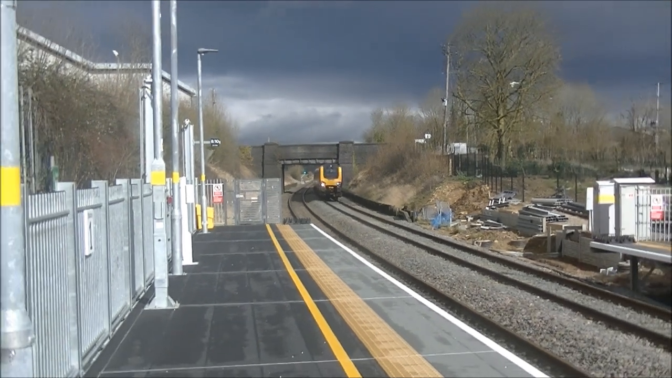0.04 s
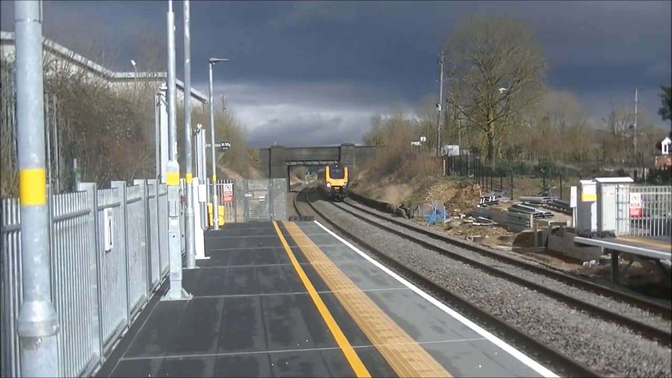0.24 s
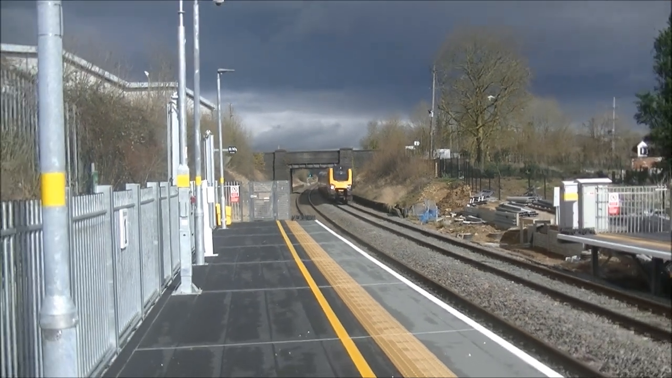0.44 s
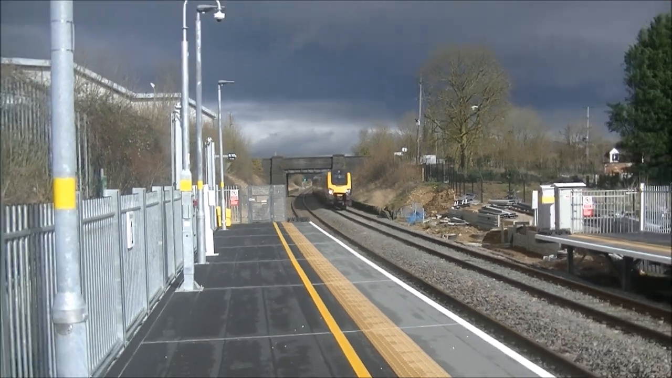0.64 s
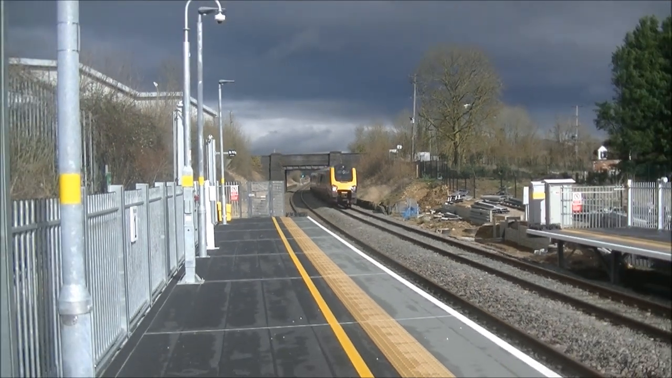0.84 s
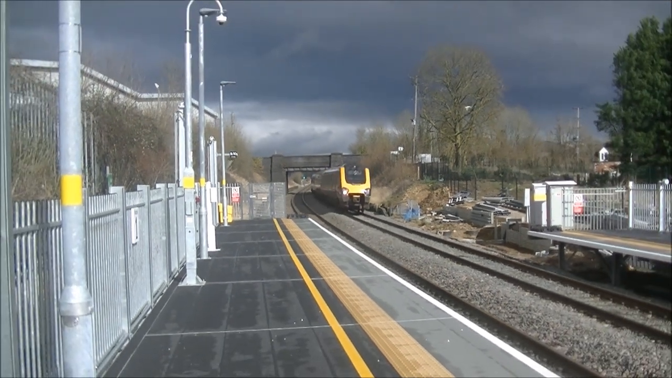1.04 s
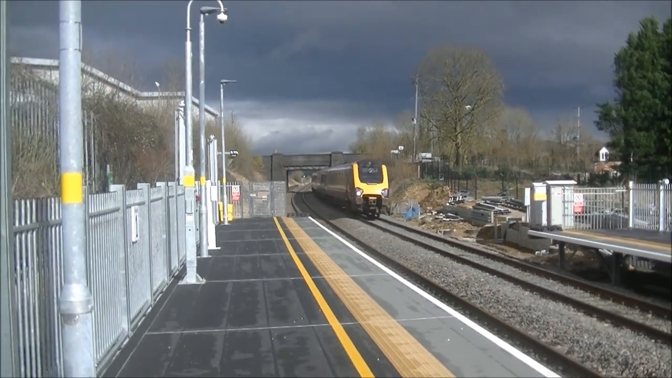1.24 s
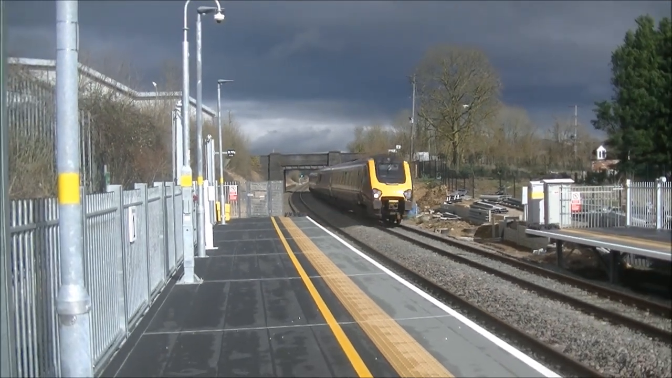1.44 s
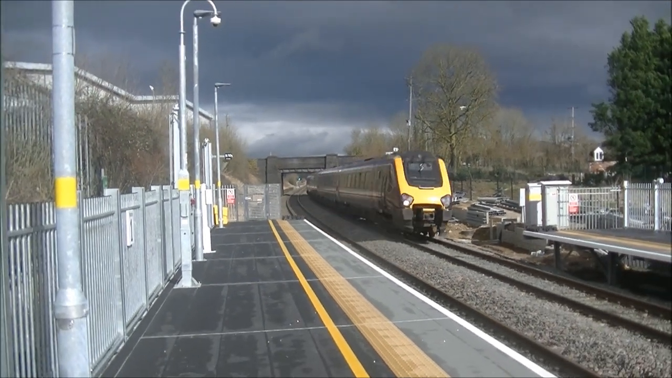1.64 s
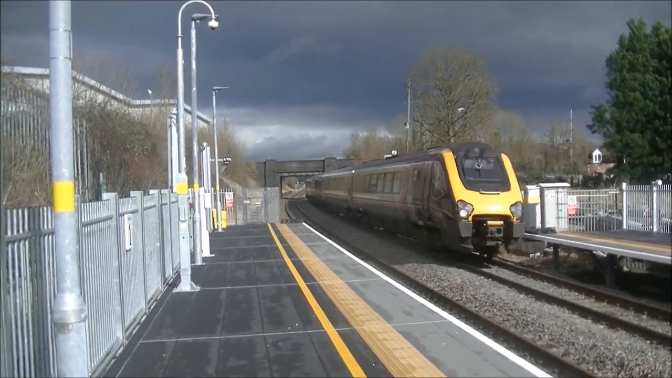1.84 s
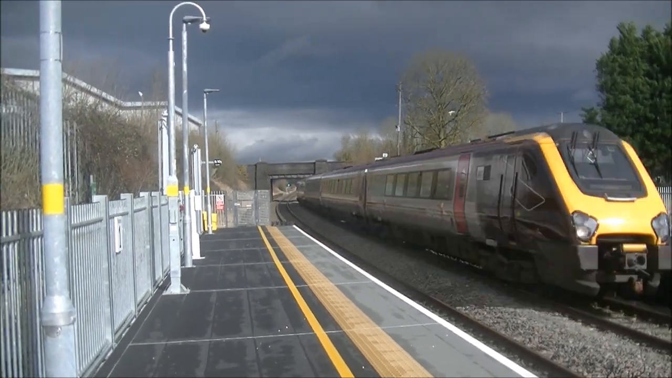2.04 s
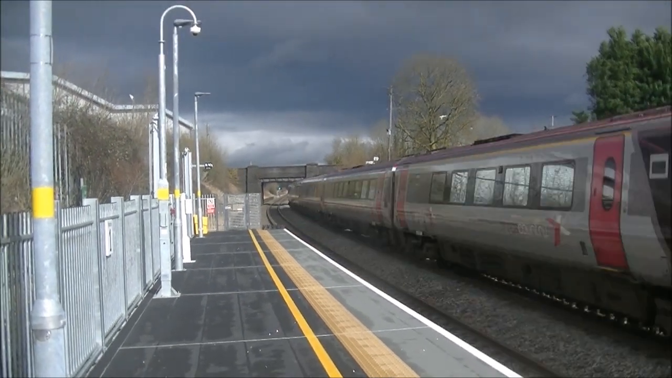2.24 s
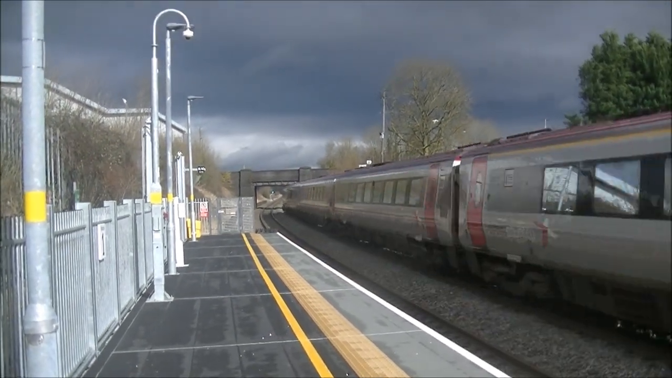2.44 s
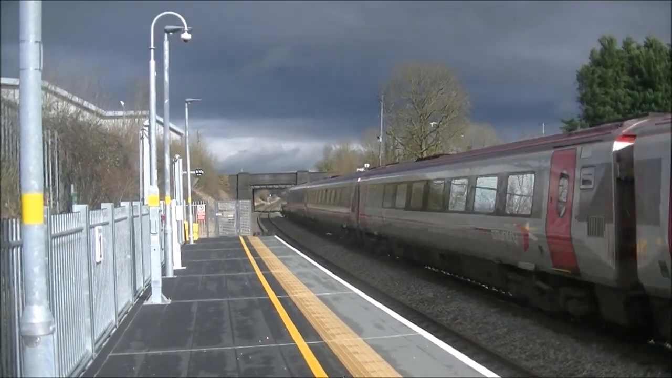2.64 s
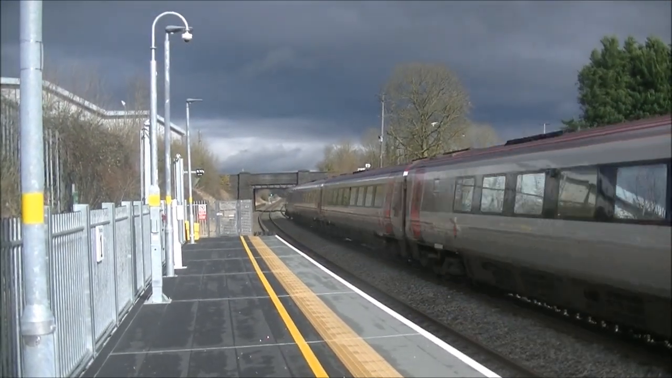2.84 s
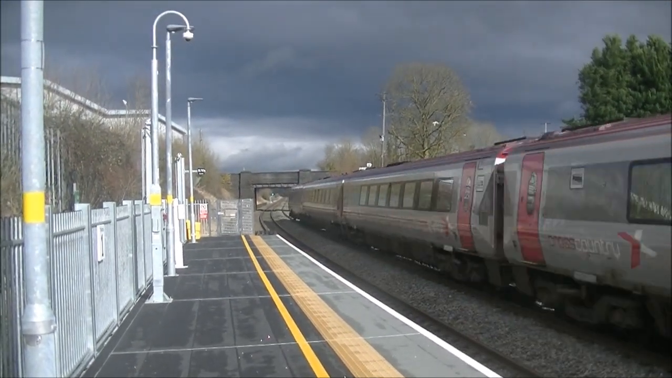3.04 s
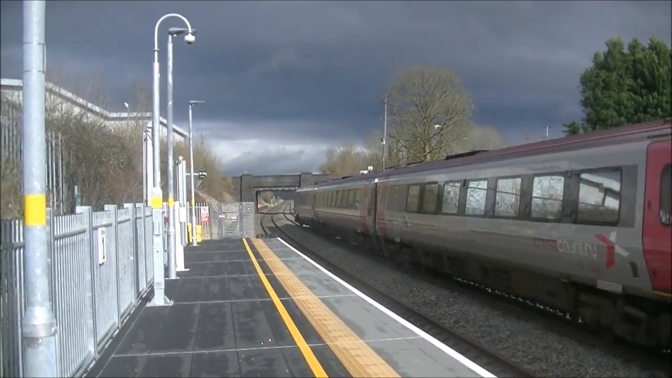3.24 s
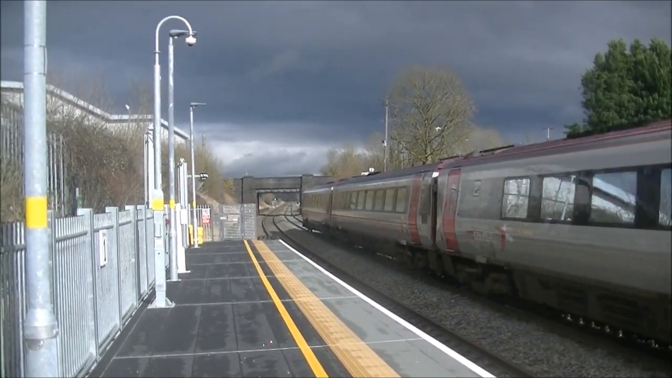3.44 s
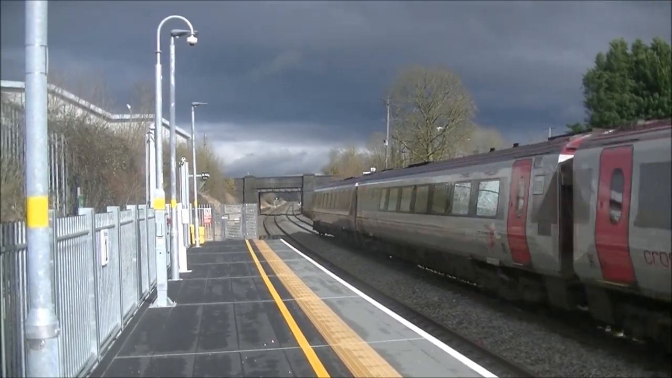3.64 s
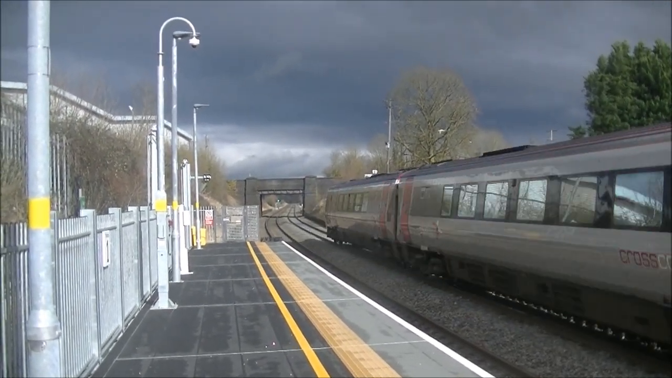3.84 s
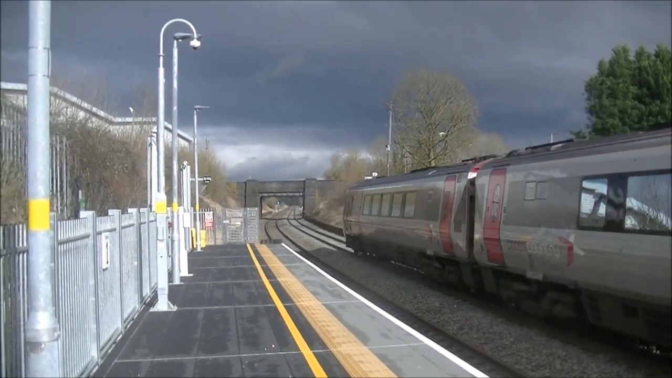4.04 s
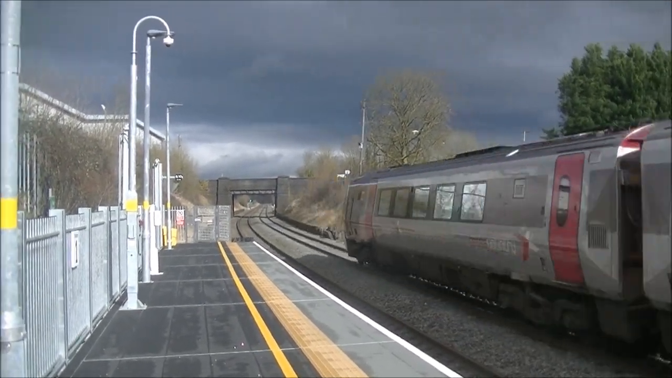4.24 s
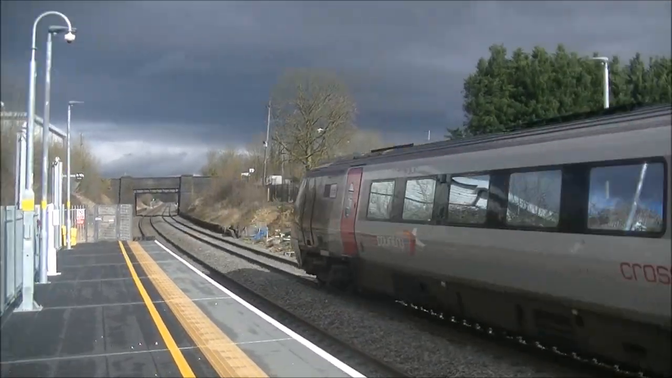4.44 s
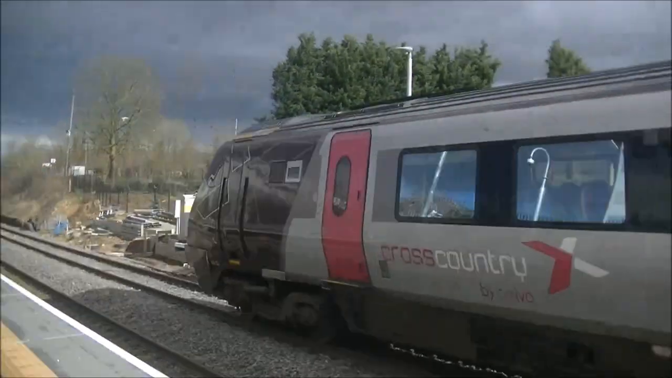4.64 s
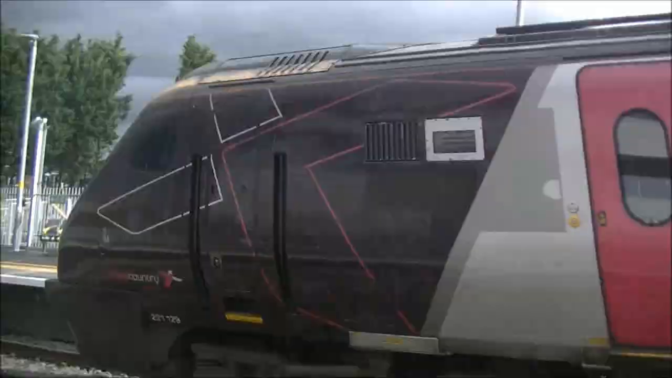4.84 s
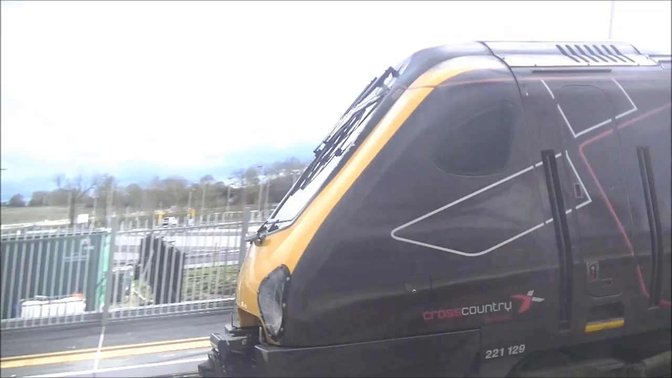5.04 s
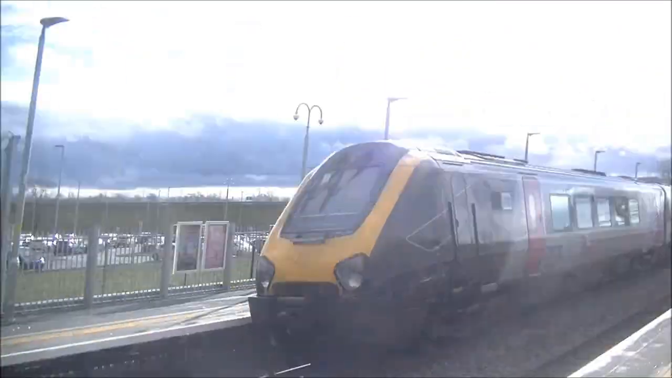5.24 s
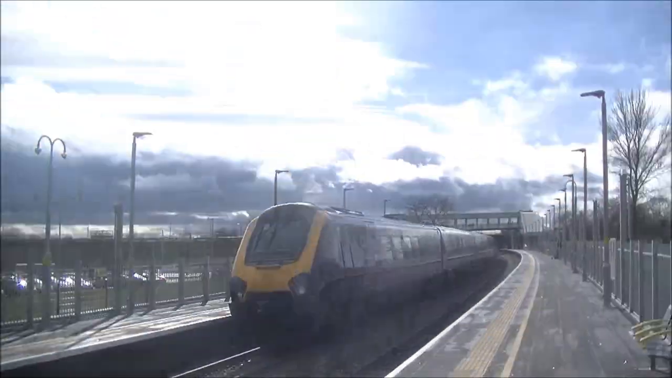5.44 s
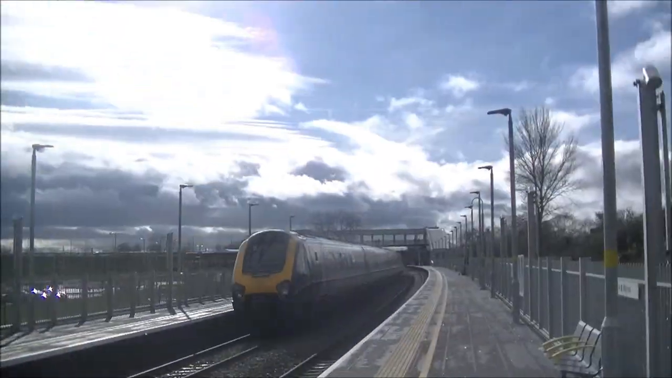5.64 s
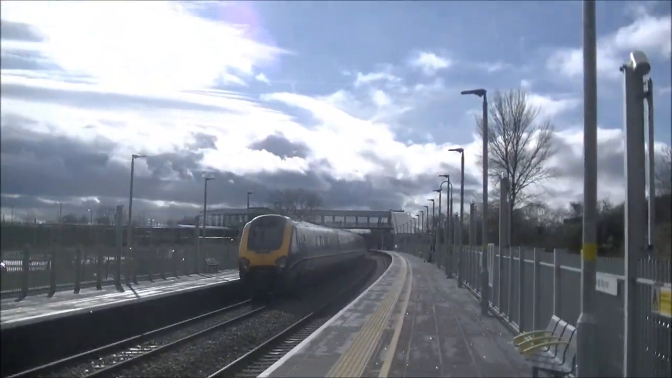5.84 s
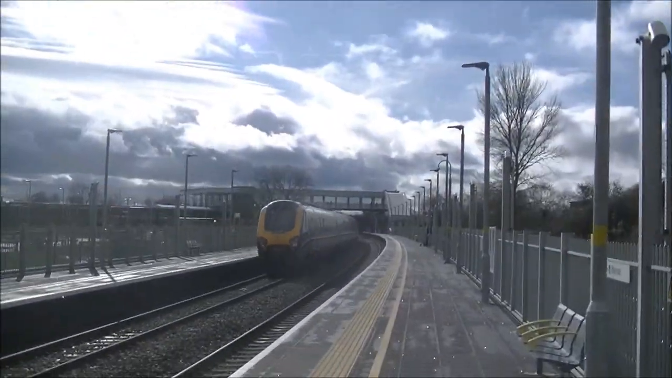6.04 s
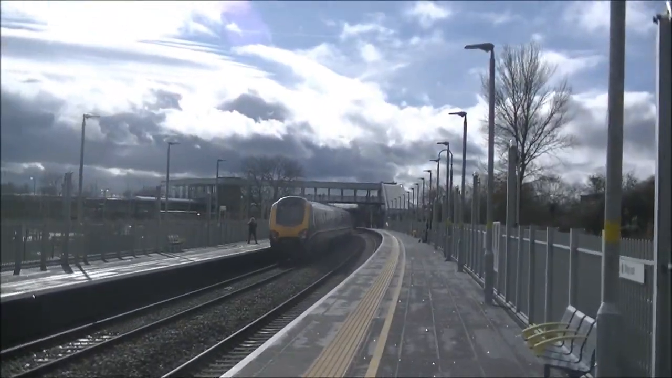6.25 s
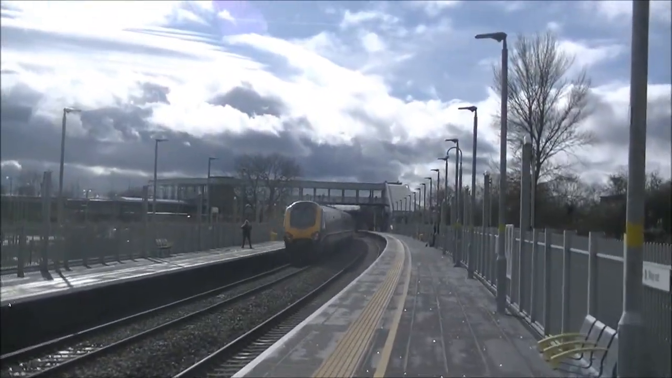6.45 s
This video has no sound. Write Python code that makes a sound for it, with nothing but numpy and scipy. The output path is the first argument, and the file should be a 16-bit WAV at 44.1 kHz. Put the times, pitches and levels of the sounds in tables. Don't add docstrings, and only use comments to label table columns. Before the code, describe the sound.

Rails sing faintly, then a fast diesel passenger train bursts past a station platform in pulsing wheel roar and rapid metallic knocks, fading to ringing rails.

```python
import sys
import numpy as np
from scipy import signal
from scipy.fft import rfft, irfft, next_fast_len
from scipy.io import wavfile
from scipy.ndimage import uniform_filter1d

SR = 44100
rng = np.random.default_rng(int(sys.argv[2]) if len(sys.argv) > 2 else 0)


def invert_db(x):
    u = np.asarray(x, float) / 20
    return 10 ** u


def generate_wav(sig):
    pcm = np.round(np.clip(np.atleast_2d(sig).T, -1, 1) * 32767).astype(np.int16)
    wavfile.write(sys.argv[1], SR, pcm)


N = 287046
T = np.arange(N) / SR
SIZE = next_fast_len(N)
HZ = np.arange(SIZE // 2 + 1) * SR / SIZE

ARRIVES_S, DEPARTS_S = 2.23, 5.23
SPEED_M_S = 42.74
DROP_PER_S = 0.59

ZONE_HZ = [600, 2000, 5500, 11500]
# [t/s, peak level/dB, rim f/Hz]
KNOCKS = [(2.2278, -15, 1710), (2.2814, -15, 2290), (2.3534, -16, 2510), (2.5434, -10, 2180),
          (2.608, -13, 2080), (2.7084, -18, 2350), (2.7844, -16, 2200), (2.8464, -10, 2140),
          (2.9714, -14, 2010), (3.0944, -16, 2120), (3.1587, -16, 2190), (3.2124, -12, 2060),
          (3.325, -11, 2330), (3.3747, -14, 2320), (3.3924, -12, 2220), (3.4326, -6, 2230),
          (3.454, -8, 2144), (3.4875, -6, 2140), (3.557, -6.5, 2680), (3.6114, -7, 2190),
          (3.7804, -17, 2560), (3.9145, -8, 2290), (3.9654, -11, 2000), (4.025, -12, 2230),
          (4.1084, -14, 1990), (4.2054, -13, 2280), (4.4064, -13, 2280), (4.5104, -12, 2230),
          (4.5755, -10, 2180), (4.6384, -14, 2390), (4.6894, -9, 2230), (4.7524, -10, 2020),
          (4.8494, -14, 2190), (4.9162, -14, 2186), (4.9514, -12, 2300), (5.0664, -6, 2710),
          (5.1297, -13, 2040), (5.1901, -17, 1990), (5.2175, -19, 1740), (5.2534, -15, 2040),
          (5.3754, -16.5, 2160)]


def shape(table, hz):
    f, v = np.transpose(table)
    return np.interp(np.log(np.maximum(hz, 1)), np.log(np.maximum(f, 1)), v)


def walk(rate_hz):
    hold = max(int(SR / rate_hz), 1)
    steps = np.repeat(rng.standard_normal(N // hold + 1), hold)
    return 1.7 * uniform_filter1d(uniform_filter1d(steps, hold), hold)[:N]


def ring(hz, width_hz, steady):
    sway = steady + walk(width_hz) + 1j * walk(width_hz)
    tone = (sway * np.exp(2j * np.pi * np.cumsum(hz) / SR)).real
    return tone / tone.std()


def pair(x, pan_db):
    return x * invert_db(np.array([pan_db, -pan_db]) / 2)


def struck(s, rise_s, fall_s):
    return np.exp(-np.abs(T - s) / np.where(T < s, rise_s, fall_s))


def throbbing():
    blows = sum(struck(s + .005, .005, .02) for s, db, hz in KNOCKS)
    shake = np.minimum(blows, 1) - .5
    return shake * np.clip(np.minimum(T - ARRIVES_S, DEPARTS_S + .1 - T) / .1, 0, 1)


def nearness():
    # [level abreast/dB, nearest distance/m, loss ahead/dB per 100 m, loss behind/dB per 100 m]
    zones = [
        (-28, 8.94, 7.5, 1.5),
        (-23.5, 7.6, 9, 4),
        (-27, 7.56, 5.5, 2),
        (-46.5, 7, 6, 2),
    ]
    roar_share = [0, 1, 0, 0]
    bright_share = [-0.73, 0.053, 0.28, 1]
    engine_weight_db = [-1.6, -1.9, -1.9, 0.01]
    open_air_db = [-58.5, -53, -65, -66.5]
    # [t abreast/s, rolling strength/dB, rough-tread roar/dB, brightness/dB]
    bogie_pairs = [
        (2.421, 1.3, -4, -0.5),
        (2.97, 0.5, 0.5, 1.8),
        (3.431, 1.8, 2, 1),
        (3.931, 0.85, -1.5, 0.1),
        (4.53, 0.3, -0.7, 1.8),
        (5.06, -0.07, 0.1, 3),
    ]
    # [t abreast/s, level/dB]
    engines = [
        (2.2, -7),
        (2.7, -5.5),
        (3.2, -17),
        (3.72, -5),
        (4.3, -1.5),
        (4.8, -4.5),
        (5.25, -26),
    ]
    s, strength_db, roar_db, bright_db = np.transpose(bogie_pairs)[:, :, None]
    along_m = SPEED_M_S * (T - s)
    engine_s, engine_db = np.transpose(engines)[:, :, None]
    engine_along_m = SPEED_M_S * (T - engine_s)
    levels = []
    for zone, roar, bright, weight_db, far_db in zip(
            zones, roar_share, bright_share, engine_weight_db, open_air_db):
        db, near_m, ahead_db, behind_db = zone
        loss_db = np.abs(along_m) / 100 * np.where(along_m < 0, ahead_db, behind_db)
        source_db = strength_db + roar * roar_db + bright * bright_db
        wheel_power = invert_db(2 * (source_db - loss_db)) / (1 + (along_m / near_m) ** 2)
        engine_power = invert_db(2 * (engine_db + weight_db)) / (1 + (engine_along_m / near_m) ** 2) ** 2
        train_power = invert_db(2 * db) * (wheel_power.sum(axis=0) + engine_power.sum(axis=0))
        levels.append(10 * np.log10(train_power + invert_db(2 * far_db)))
    levels[1] = levels[1] + 1.5 * throbbing()
    return levels


def levelled(colour):
    # [low f/Hz, high f/Hz]
    zone_edges_hz = [(150, 1200), (1200, 3000), (3000, 9000), (9300, 15000)]
    db = shape(colour, HZ)
    zone_db = []
    for lo, hi in zone_edges_hz:
        power = np.sum(invert_db(2 * db[(HZ > lo) & (HZ < hi)])) / len(HZ)
        zone_db.append(10 * np.log10(power))
    return db - shape(list(zip(ZONE_HZ, zone_db)), HZ)


def rolling(zones_db, pan_db):
    # [f/Hz, density/dB per Hz]
    coming = [(150, -110), (200, -92), (320, -96), (420, -79), (700, -80), (1100, -75.5), (1380, -77.5),
              (2300, -77), (2950, -85), (3900, -82.5), (6000, -92.5), (8300, -95), (9600, -100),
              (14500, -102), (15400, -112)]
    # [f/Hz, density/dB per Hz]
    passing = [(59, -76), (100, -46), (341, -15), (590, -8.5), (744, -4.5), (1340, -6), (2280, 0),
               (2640, -2.5), (3790, -3.5), (4780, -11.5), (5310, -7), (7930, -15.5), (8700, -18.5),
               (9590, -28), (12900, -29.5), (15600, -36)]
    # [f/Hz, density/dB per Hz]
    leaving = [(100, -106), (250, -91.5), (500, -74), (900, -70), (1250, -71), (2150, -67), (2800, -76),
               (4000, -73), (5500, -79.5), (8300, -83.5), (9500, -89), (12000, -92), (15000, -91),
               (15700, -97)]
    # [f/Hz, likeness 0-1]
    likeness = [(100, 0.39), (200, 0.97), (500, 0.98), (1000, 0.86), (2000, 0.91), (4000, 0.89),
                (8000, 0.92), (12000, 0.9)]
    blend_s = 0.14
    ahead = 1 / (1 + np.exp((T - ARRIVES_S) / blend_s))
    behind = 1 / (1 + np.exp((DEPARTS_S - T) / blend_s))
    abreast = np.maximum(1 - ahead - behind, 0)
    bass_cut = 1 / np.sqrt(1 + (125 / np.maximum(HZ, 1)) ** 6)
    noise = np.zeros((2, N))
    for share, colour in ((ahead, coming), (abreast, passing), (behind, leaving)):
        spectrum = rfft(rng.standard_normal((2, SIZE))) * invert_db(levelled(colour)) * bass_cut
        noise = noise + np.sqrt(share) * irfft(spectrum, SIZE)[:, :N]
    noise = rfft(noise, SIZE)
    out, flicker = 0, walk(8.1)
    for step in range(23):
        hz = 100 * 2 ** (step / 3)
        offset = np.clip(3 * np.log2(np.maximum(HZ, 1) / hz), -1, 1)
        mid, side = irfft(noise * np.cos(np.pi / 2 * offset) ** 2, SIZE)[:, :N]
        place = np.interp(np.log(hz), np.log(ZONE_HZ), np.arange(4))
        below = min(int(place), 2)
        part = place - below
        db = (1 - part) * zones_db[below] + part * zones_db[below + 1]
        flicker = 0.48 * flicker + 0.65 * walk(9.9)
        db = db + (.5 + 0.55 * min(hz / 8000, 1)) * flicker
        like = np.clip(shape(likeness, hz), 0, .995)
        both = np.sqrt((1 + like) / 2) * mid + np.sqrt((1 - like) / 2) * side * np.array([[1], [-1]])
        directional = 0.8 * np.exp(-(np.log2(hz / 1600) / 0.79) ** 2)
        out = out + pair(invert_db(db) * both, pan_db * directional)
    return out


def rails():
    # [t/s, partial spacing/Hz, whine level/dB, hum level/dB]
    sing = [
        [(0, 782, -63.5, -65), (2.5, 773.5, -56, -48)],
        [(5.15, 732, -52, -45.5), (6.51, 722.5, -60.5, -58)],
    ]
    # [number, level ahead/dB, level behind/dB]
    partials = [(7, -14, -8), (8, -12, -8), (9, -4, -1), (10, -5, -1), (11, -8, -1), (12, -15, -3),
                (13, -11, -14), (14, -13, -9), (15, -12, -15), (16, -13, -10), (17, -13, -10),
                (18, -12, -10), (19, -18, -10)]
    # [f ahead/Hz, width/Hz, level ahead/dB, level behind/dB]
    resonances = [(470, 70, -2, -10), (813, 35, 2, -9), (974, 45, -5, -20), (992, 40, -20, 0),
                  (1068, 70, 1, -4), (1195, 90, 3, -3), (1590, 40, -7, -4), (2335, 160, -2, 2),
                  (4250, 400, -20, 1), (5610, 50, -10, -8), (7700, 70, -8, -10), (8430, 30, -12, -9)]
    # [t/s, f/Hz, width/Hz, half length/s, level/dB]
    flares_ahead = [(.4, 10142, 40, .14, -69), (1.27, 8565, 40, .2, -54), (1.38, 8420, 40, .08, -60),
                    (1.78, 8545, 50, .24, -56), (2.32, 8550, 60, .05, -49), (1.65, 7700, 120, .35, -55),
                    (2.03, 5450, 70, .2, -45), (1.88, 5470, 90, .045, -45), (1.79, 5500, 150, .06, -56),
                    (2.25, 5350, 200, .1, -46), (1.38, 1592, 20, .08, -43), (1.24, 1592, 40, .05, -53),
                    (1.85, 1585, 30, .06, -47), (2.05, 1585, 30, .08, -46), (1.6, 1590, 30, .08, -52),
                    (.6, 7030, 140, .6, -63), (.5, 700, 60, .3, -58), (.68, 1592, 30, .13, -57),
                    (.45, 968, 30, .26, -54), (.4, 1070, 80, .15, -53), (.645, 1230, 40, .025, -47),
                    (.66, 1075, 40, .035, -46), (.97, 972, 30, .15, -46), (.95, 1060, 40, .06, -49),
                    (1.07, 812, 25, .23, -53), (1.57, 975, 30, .13, -42), (1.91, 970, 30, .12, -43),
                    (1.62, 1068, 40, .2, -46), (2.1, 1065, 40, .06, -42)]
    # [t/s, f/Hz, width/Hz, half length/s, level/dB]
    flares_behind = [(5.33, 8010, 260, .18, -45), (5.59, 7990, 100, .04, -49), (5.32, 7300, 160, .18, -48),
                     (5.81, 7040, 40, .045, -54), (6.14, 7240, 70, .055, -55), (6.13, 8730, 40, .08, -59),
                     (5.66, 8745, 70, .2, -58), (5.58, 6530, 60, .03, -49), (5.5, 700, 60, .03, -43),
                     (6.2, 1030, 50, .08, -50), (6.04, 2170, 25, .11, -40.5), (5.28, 925, 30, .05, -39),
                     (5.41, 925, 35, .04, -42), (5.53, 925, 35, .05, -42), (5.7, 925, 50, .04, -44),
                     (5.86, 925, 60, .08, -46), (5.84, 2000, 500, .08, -42), (5.8, 3900, 700, .08, -46),
                     (6.25, 920, 40, .2, -52)]
    s, *columns = np.concatenate(sing).T
    spacing_hz, whine_db, hum_db = (np.interp(T, s, c) for c in columns)
    ahead = np.clip((sing[0][-1][0] - T) / 0.24, 0, 1)
    behind = np.clip((T - sing[1][0][0]) / 0.19, 0, 1)
    out = 0
    for k, ahead_db, behind_db in partials:
        size = (ahead * invert_db(ahead_db) + behind * invert_db(behind_db)) * invert_db(whine_db + 2.2 * walk(6))
        out = out + size * ring(k * spacing_hz, 40 + 6 * k, steady=.35)
    for hz, width_hz, ahead_db, behind_db in resonances:
        size = (ahead * invert_db(ahead_db) + behind * invert_db(behind_db)) * invert_db(hum_db + 2.0 * walk(6))
        out = out + size * ring(hz * spacing_hz / 779, width_hz, steady=0)
    for s, hz, width_hz, half_s, db in [*flares_ahead, *flares_behind]:
        size = invert_db(db) * np.exp(-((T - s) / half_s) ** 4)
        steady = min(65 / width_hz, 1.6) ** 2
        out = out + size * ring(np.full(N, hz), width_hz, steady)
    return out


def wind():
    # [t/s, level/dB]
    gust_table = [
        (1.05, -86),
        (1.47, -91),
        (2.45, -84),
        (2.77, -77),
        (3.1, -80),
        (3.42, -75),
        (4.4, -75),
        (5.07, -77),
        (5.8, -83),
    ]
    calm_db, draught_db, gust_s = -85.5, -80, .11
    low = signal.sosfilt(signal.butter(2, 110, fs=SR, output="sos"), rng.standard_normal((2, N)))
    draught = np.clip(np.minimum(T - ARRIVES_S, DEPARTS_S + .7 - T) / .3, 0, 1)
    gusts = sum(invert_db(db) * np.exp(-((T - s) / gust_s) ** 2) for s, db in gust_table)
    size = np.maximum(gusts, invert_db(calm_db + draught * (draught_db - calm_db)))
    return low / low.std() * size * invert_db(2 + 1.5 * walk(6))


def ticks():
    # [t/s, peak level/dB]
    contacts = [
        (1.4523, -10.5),
        (1.4646, -17.5),
        (1.4676, -21),
    ]
    # [f/Hz, level/dB, t60/s]
    shell = [(2510, 0, 0.0075), (3170, 6, 0.004), (3700, 0, 0.008), (4250, 2, 0.0045), (5700, -2, 0.0065),
             (7460, -14, .002)]
    t, out = T[:SR // 10], np.zeros(N)
    body = 0
    for hz, db, t60_s in shell:
        body = body + invert_db(db) * np.sin(2 * np.pi * hz * t) * np.exp(-np.log(1000) * t / t60_s)
    body = body * (1 - np.exp(-t / 0.00014))
    body = signal.sosfilt(signal.butter(2, 1200, "high", fs=SR, output="sos"), body)
    thump = invert_db(-46) * np.sin(2 * np.pi * 120 * t) * np.exp(-t / .012)
    body = body / np.max(np.abs(body)) + thump
    for s, db in contacts:
        start = int(s * SR)
        out[start:start + len(t)] += invert_db(db) * body
    return out


def bogies():
    # [t/s, f abreast/Hz, half length/s, level/dB]
    discs = [(2.49, 7750, .05, -48), (2.55, 4400, .04, -40), (2.59, 5380, .05, -41), (2.73, 7550, .05, -47),
             (2.8, 8500, .05, -47), (2.9, 8900, .04, -48), (2.92, 6750, .04, -41), (2.95, 4430, .05, -35),
             (3.13, 6830, .07, -43), (3.25, 6000, .04, -45), (3.29, 8350, .04, -47), (3.33, 3020, .06, -33),
             (3.385, 2320, .025, -25), (3.42, 3720, .05, -30), (3.43, 7850, .04, -45),
             (3.44, 2880, .04, -30), (3.49, 3430, .018, -27), (3.5, 6700, .06, -43), (3.52, 8650, .04, -45),
             (3.54, 5580, .045, -39), (3.525, 2750, .012, -29), (3.59, 2320, .05, -31),
             (3.575, 3950, .015, -32), (3.615, 3900, .015, -31), (3.65, 4600, .04, -39),
             (3.89, 5420, .04, -41), (3.9, 8850, .07, -48), (3.93, 3650, .04, -35), (3.93, 3390, .04, -37),
             (3.98, 6700, .04, -45), (4.45, 7800, .04, -45), (4.64, 7750, .05, -47), (4.69, 3800, .05, -36),
             (4.99, 8430, .045, -43), (5.0, 4550, .04, -39), (5.05, 8850, .04, -45),
             (5.07, 3680, .012, -30), (5.07, 2740, .012, -29), (5.07, 1300, .008, -29),
             (5.13, 2020, .02, -26), (5.14, 3500, .03, -33), (5.22, 1760, .04, -30), (5.1, 5250, .05, -41)]
    rim_db, crack_db = -11, -14
    out = 0
    for s, hz, half_s, db in discs:
        x = (T - s) / half_s
        glide_hz = hz * (1 - DROP_PER_S * half_s * np.tanh(x))
        out = out + invert_db(db) * np.exp(-x ** 2) * ring(glide_hz, .025 * hz, steady=1.6)
    band = signal.butter(2, [1300, 4600], "band", fs=SR, output="sos")
    crack = signal.sosfilt(band, rng.standard_normal(N))
    crack = crack / crack.std()
    waver = np.cumsum(110 * walk(90))
    for s, db, hz in KNOCKS:
        rim = np.sin(2 * np.pi * (hz * T + waver / SR))
        out = out + invert_db(db + rim_db) * struck(s + 0.0025, .002, .012) * rim
        out = out + invert_db(db + crack_db) * struck(s + 0.0034, 0.0012, 0.0059) * crack
    return out


def wheels():
    # [t/s, f abreast/Hz, width/Hz, half length/s, level/dB]
    wheel_rings = [(2.497, 2240, 305, 0.15, -29.5), (2.55, 13100, 1100, .09, -52),
                   (3.03, 13100, 1100, .1, -62), (4.47, 13400, 1100, .13, -58), (2.95, 2200, 198, .2, -29),
                   (3.017, 2200, 57, 0.076, -28), (3.46, 2185, 400, 0.08, -32), (3.37, 2320, 200, .06, -29),
                   (3.07, 2027, 300, .05, -31), (4.603, 2265, 423, .13, -25.5),
                   (4.645, 2874, 220, 0.09, -33), (4.86, 2200, 600, .09, -25.5),
                   (4.98, 2250, 450, 0.082, -26.5), (5.07, 2150, 350, .05, -28),
                   (5.3, 1950, 450, .08, -30.5), (5.43, 2200, 400, .1, -34), (2.35, 2400, 300, .1, -30.5),
                   (5.17, 1993, 520.3, 0.15, -33)]
    # [t/s, f abreast/Hz, width/Hz, half length/s, level/dB]
    hums = [(2.32, 560, 90, 0.081, -34.5), (3.84, 335, 60, 0.053, -39), (3.1, 745, 90, 0.103, -34),
            (3.86, 725, 60, 0.038, -31), (4.199, 745, 62, 0.073, -36), (2.436, 1576, 58.6, 0.133, -36),
            (3.33, 2330, 60, 0.015, -21), (3.581, 740, 72, 0.129, -28), (4.048, 750, 81, 0.303, -34.5),
            (4.319, 14300, 119, .06, -55), (4.697, 755, 96, 0.131, -33.5), (5.05, 700, 82, 0.097, -31),
            (3.7, 745, 60, 0.067, -32.5)]
    out = 0
    throb = invert_db(4 * throbbing())
    for s, hz, width_hz, half_s, db in wheel_rings:
        x = (T - s) / half_s
        glide_hz = hz * (1 - DROP_PER_S * half_s * np.tanh(x))
        out = out + invert_db(db) * np.exp(-x ** 2) * throb * ring(glide_hz, width_hz, steady=0)
    for s, hz, width_hz, half_s, db in hums:
        x = (T - s) / half_s
        glide_hz = hz * (1 - .024 * np.tanh(x))
        out = out + invert_db(db) * np.exp(-x ** 2) * ring(glide_hz, width_hz, steady=0)
    return out


def scene():
    # [t/s, left minus right/dB]
    bearing = [
        (0, 1),
        (1.0, -2),
        (2.0, 1.5),
        (2.5, -4.5),
        (4.2, -4),
        (4.78, -3.5),
        (4.9, 0),
        (5.45, 2.5),
        (6.51, 3),
    ]
    pan_db = np.interp(T, *np.transpose(bearing))
    tones = rails() + bogies() + wheels()
    return rolling(nearness(), pan_db) + pair(tones, pan_db) + wind() + ticks()


def top_cut(x):
    return signal.sosfilt(signal.butter(12, 15740, fs=SR, output="sos"), x)


def record(dry):
    # [f/Hz, left minus right/dB]
    balance = [(60, 2), (110, -3), (200, -4.5), (380, -3), (700, 2.5), (1290, -2), (2380, -2), (4400, 1),
               (8120, 0.5), (15000, -0.5)]
    # [f/Hz, left lead/rad]
    lead = [(0, 0), (340, 0.4576), (860, -0.18), (1380, -0.3), (3190, 0.66), (4480, -0.54), (5080, 0.84),
            (5770, 0.075), (7410, -0.12), (9220, 0.057), (9730, 0.1), (10200, .45), (10900, .6),
            (11400, .1), (15300, 0)]
    # [t/s, half length/s]
    opens = [(2.225, .015), (2.56, .11), (2.965, .015), (3.11, .05), (3.29, .012), (3.5, .045), (3.61, .03),
             (3.94, .025), (4.08, .045), (4.17, .02), (4.45, .015), (4.54, .025), (4.7, .07), (5.37, .04),
             (5.93, .03)]
    open_db, shut_db = 3, -6
    tilt = invert_db(0.72 * shape(balance, HZ) / 2) * np.exp(.5j * shape(lead, HZ))
    ports = irfft(rfft(dry, SIZE) * np.array([tilt, 1 / tilt]), SIZE)[:, :N]
    treble = signal.butter(3, 6500, "high", fs=SR, output="sos")
    side = signal.sosfiltfilt(treble, ports[0] - ports[1]) / 2
    opened = sum(np.exp(-((T - s) / half_s) ** 6) for s, half_s in opens)
    loud = (T > ARRIVES_S - .4) & (T < DEPARTS_S + .27)
    width_db = shut_db * loud * (1 - opened) + open_db * opened
    ports = ports + (invert_db(width_db) - 1) * side * np.array([[1], [-1]])
    return top_cut(ports)


dry = scene()
out = record(dry)
generate_wav(out)
```